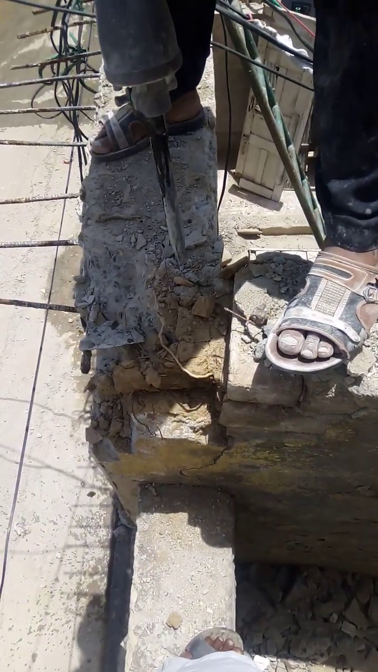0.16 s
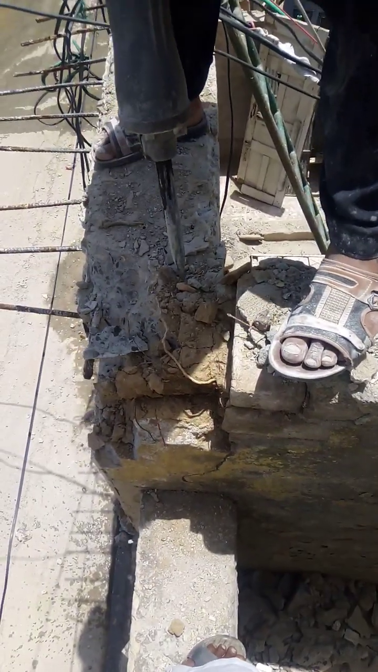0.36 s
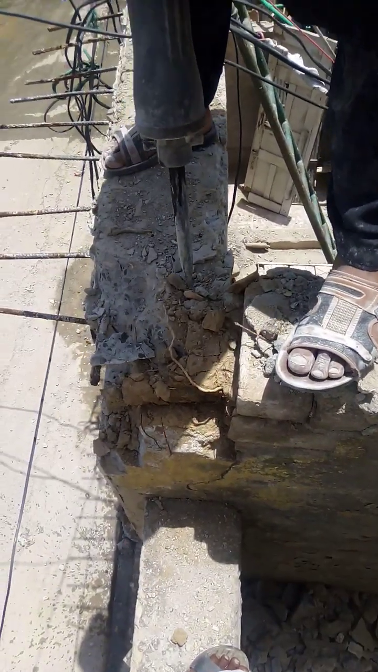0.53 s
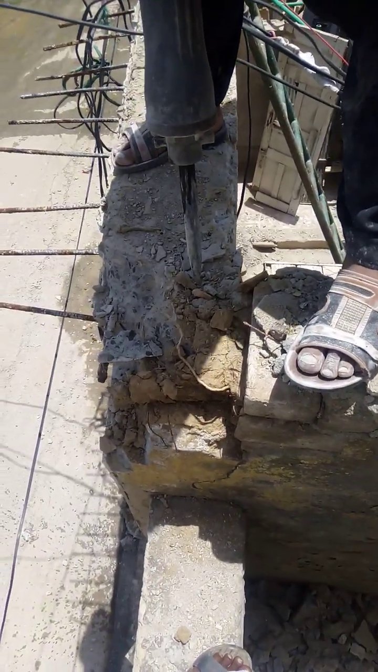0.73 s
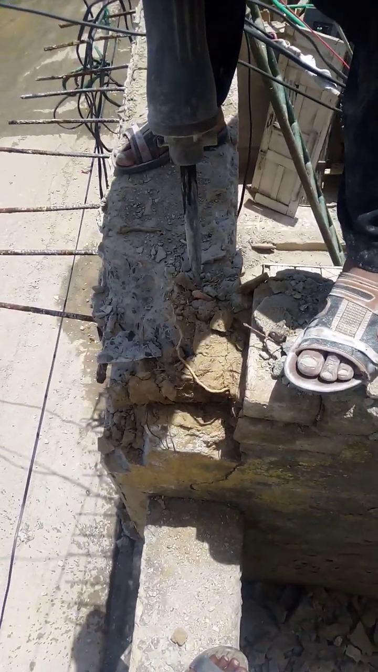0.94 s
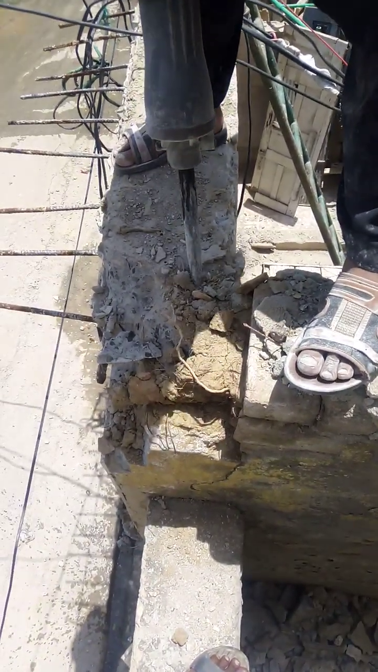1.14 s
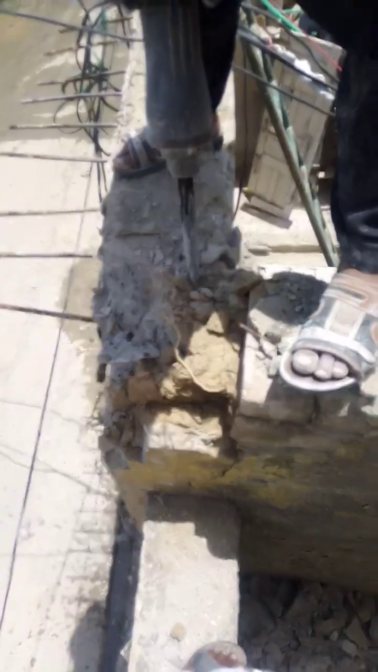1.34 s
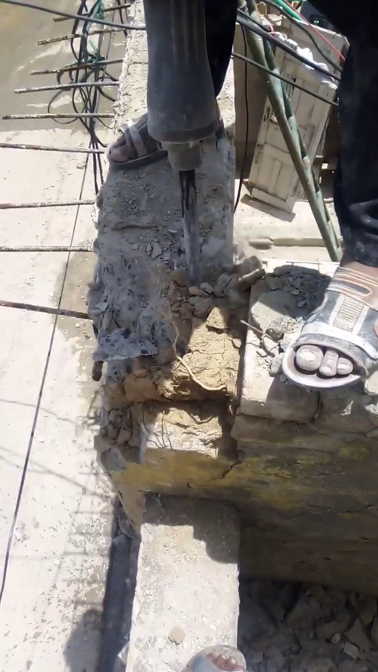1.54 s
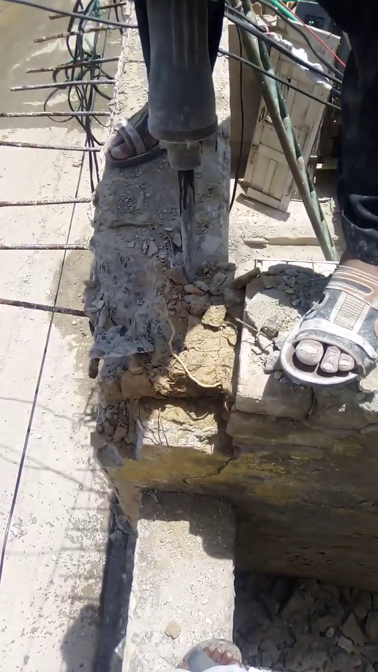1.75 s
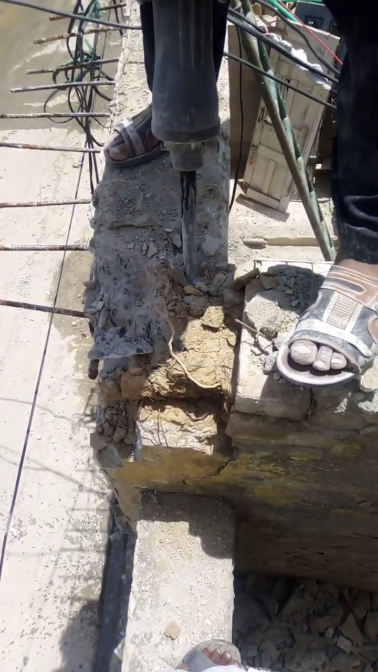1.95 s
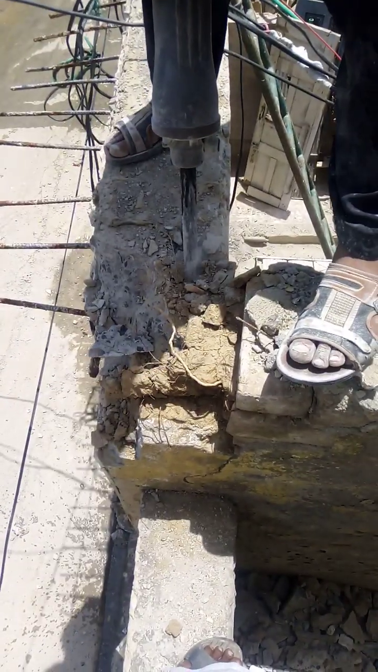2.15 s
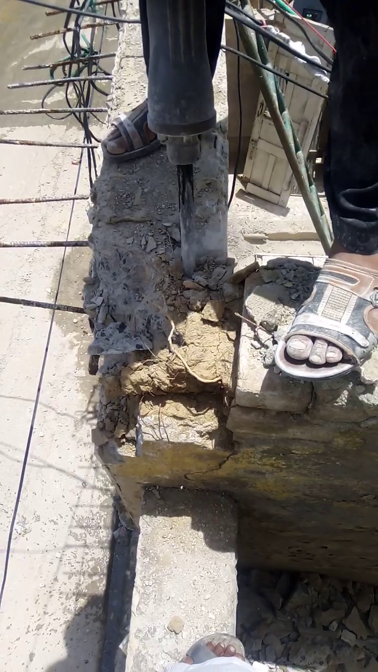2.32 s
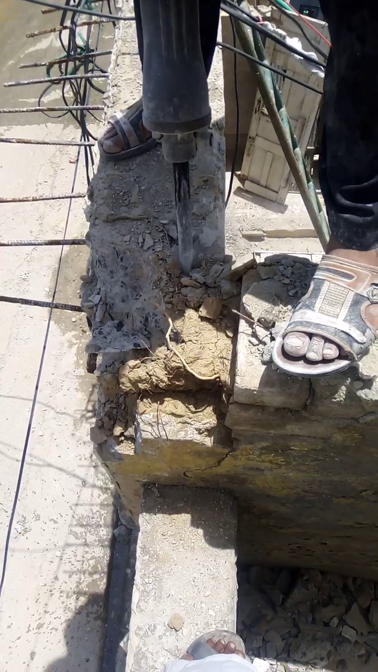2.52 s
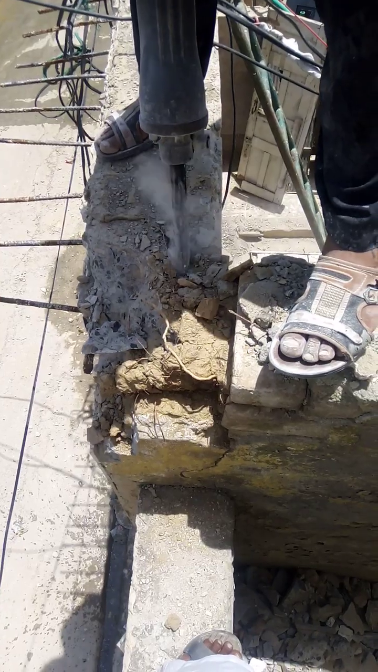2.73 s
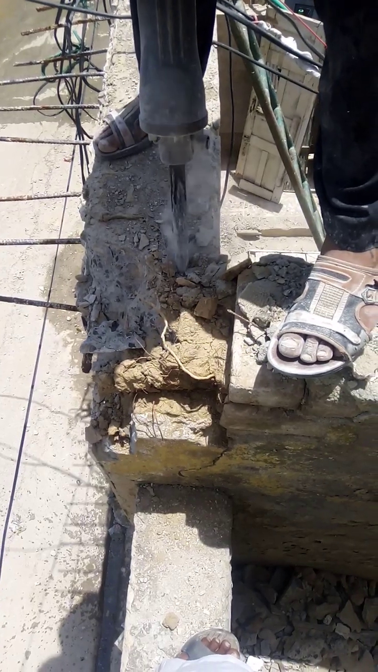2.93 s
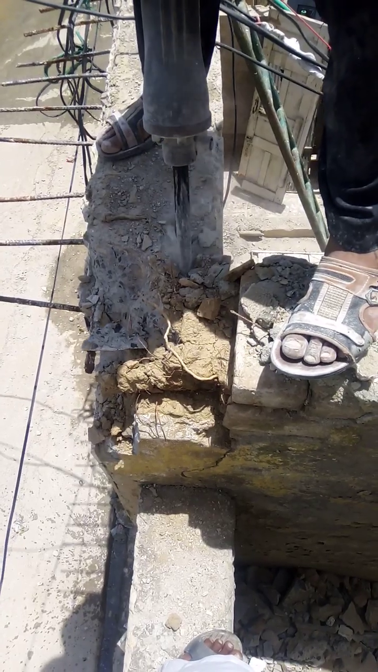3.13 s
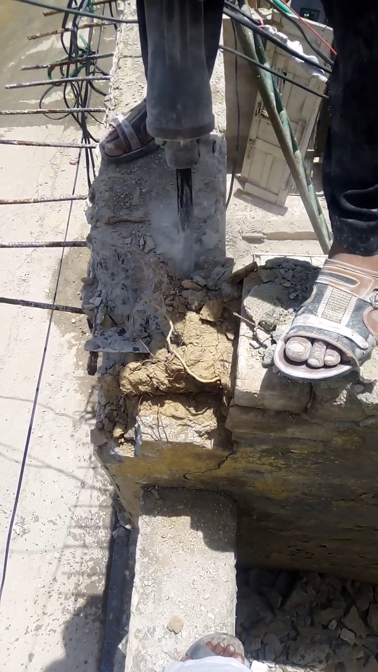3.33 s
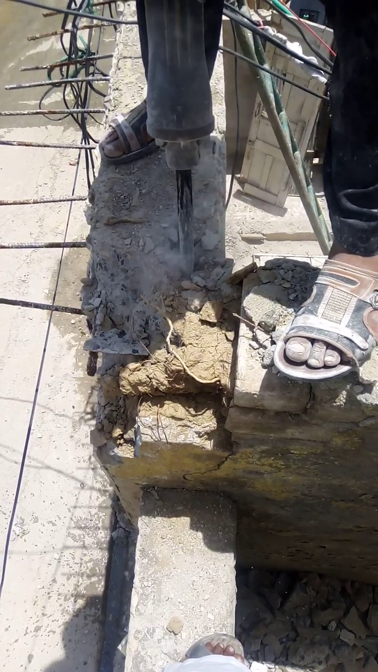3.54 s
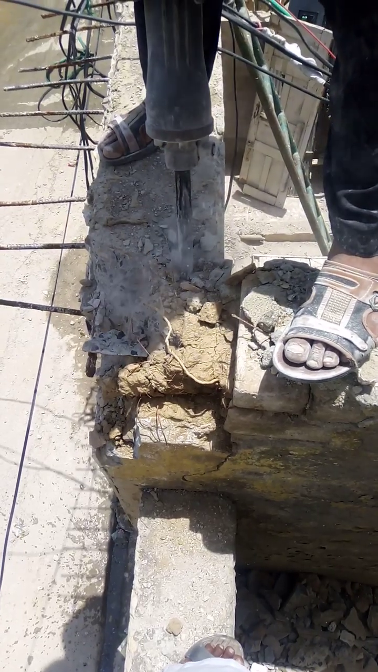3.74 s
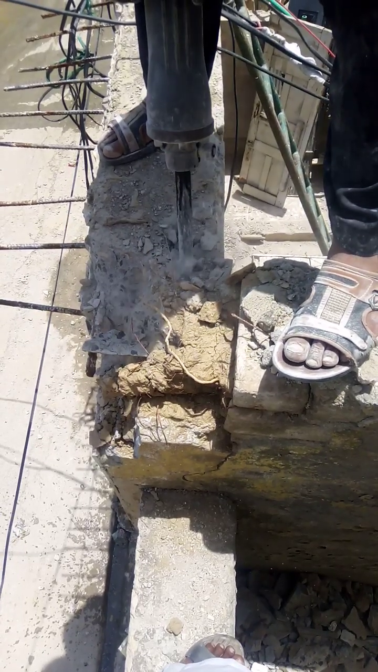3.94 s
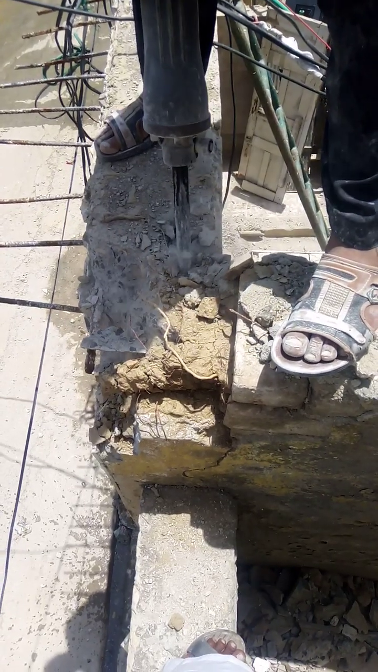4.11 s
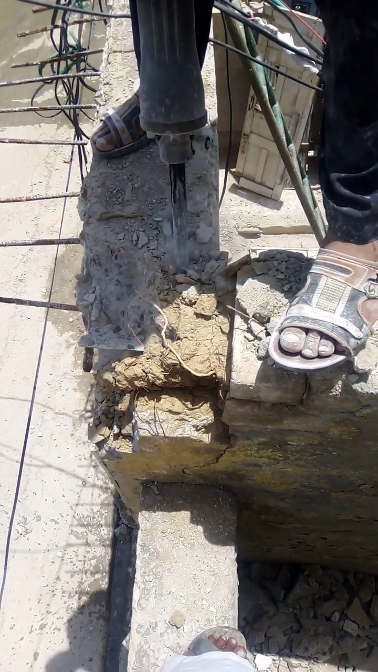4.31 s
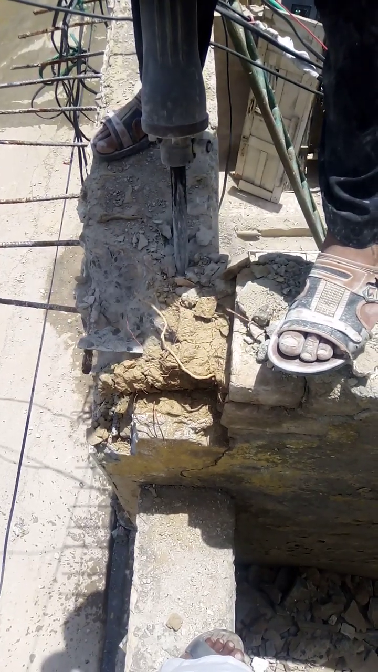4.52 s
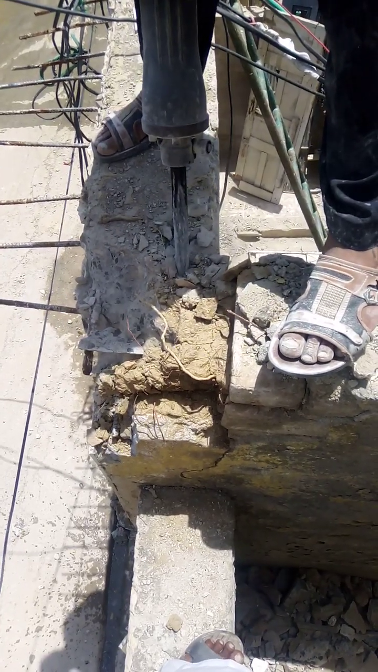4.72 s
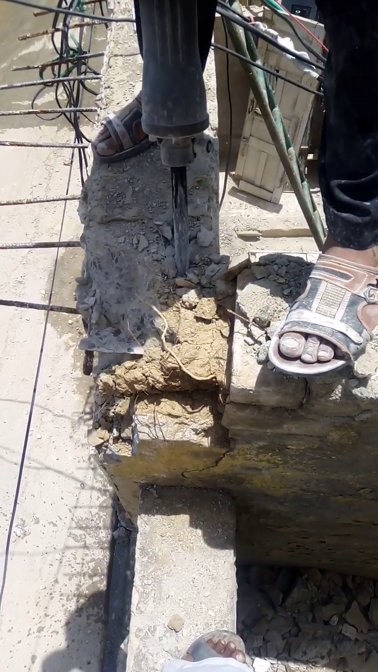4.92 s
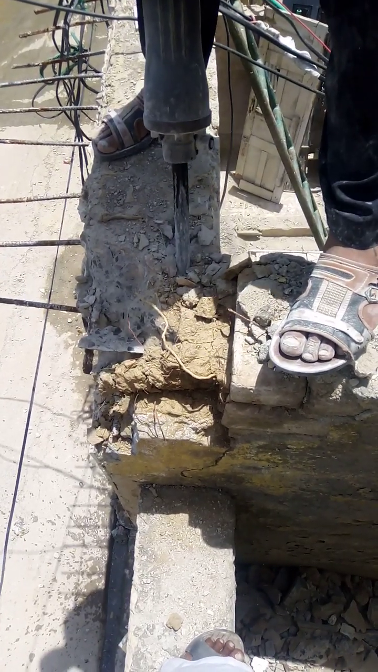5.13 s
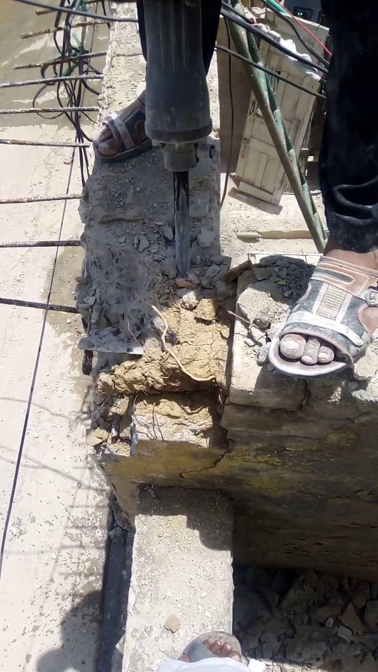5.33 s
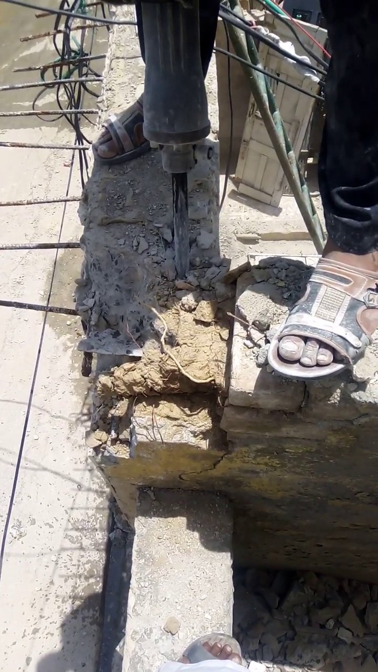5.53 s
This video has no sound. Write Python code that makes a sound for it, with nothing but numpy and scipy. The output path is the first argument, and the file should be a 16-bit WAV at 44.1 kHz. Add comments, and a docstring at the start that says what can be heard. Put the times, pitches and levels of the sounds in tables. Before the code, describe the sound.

The first 0.9 seconds are quiet: a faint low outdoor rumble and thin high hiss, with a steel chisel being placed. Small clinks and gritty scrapes cluster at 0.2-0.4 s, strongest near 0.33 s, followed by soft handling bumps and weak ticks around 0.5-0.7 s. From 0.75 s the chisel slides with a faint rubbing tone and a thin squeak rising to 0.93 s. At 0.9 s the electric motor growls abruptly; blows begin just before 1 s and accelerate to about 25 per second by 1.4 s. Loud, bright steel cracks, midrange knocks and crumbling stone then continue unbroken, with gear and fan rattle, striker clacks and chisel jingle between them. Low wall thuds come in spells from 1.4 to 3.7 s, heaviest around 3.1 s, and again near 4.3 and 5 s. Jingling lessens after 2 s as the tip wedges. The rate sags briefly around 5.3 s; hammering runs to the end, about 5.5 s, close and nearly dry.

```python
"""Over a low outdoor rumble and a faint high hiss, a steel chisel scrapes and clinks as it is set on stone. It
slides in its holder with rubbing noise on a few tones, while a thin whine rises as the motor runs up: a gliding
sine. The electric demolition hammer's motor then growls and runs up: shaped noise, repeated with each crank
turn. Soon the striker hits about 25 times a second. Each blow is a noise crack, a ringing chisel and a wall
thud. Between blows the gears and fan rattle, the striker clacks back and the chisel jingles in its holder."""
import sys
import numpy as np
from scipy import signal
from scipy.io import wavfile
from scipy.ndimage import uniform_filter1d, minimum_filter1d

SR = 44100
rng = np.random.default_rng(int(sys.argv[2]) if len(sys.argv) > 2 else 0)


def wav_out(sig):
    """Save sig, one row per channel (or a flat mono array), as 16-bit PCM at SR to the path in sys.argv[1]."""
    wavfile.write(sys.argv[1], SR, np.round(np.clip(np.atleast_2d(sig).T, -1, 1) * 32767).astype(np.int16))


N = 245637
TIME = np.arange(N) / SR  # seconds since the start of the scene
AGE = np.arange(4096) / SR  # seconds since the start of one short sound

# Tone colour of the outdoor rumble. Each row: frequency in Hz, level in dB per Hz.
RUMBLE_COLOUR = [(20, -25), (70, 5), (160, 1), (280, -15), (450, -8.5), (1100, -16.5), (2000, -29),
                 (9000, -54)]
# Loudness of the rumble. Each row: time in seconds, level in dB.
RUMBLE_LEVEL = [(.1, -64), (.3, -55.5), (.7, -62)]
# Tone colour of the faint high hiss. Each row: frequency in Hz, level in dB per Hz.
HISS_COLOUR = [(1100, -4), (2800, -32), (5200, 2), (6600, 10), (7300, -4), (8400, -31), (16000, -40)]
# Loudness of the hiss. Each row: time in seconds, level in dB.
HISS_LEVEL = [(.15, -83), (.2, -65), (.38, -57.5), (.8, -56.5), (.92, -56)]

# The loose chisel being placed. Each row: start in seconds, level in dB before a common 1 dB cut,
# share of steel ring in the energy (0-1), fading time of the scrape in seconds.
CLINKS = [(.040, -46, .05, .003), (.191, -41, .8, .02), (.234, -27, .96, .012), (.254, -35, .8, .008),
          (.322, -28, .02, .002), (.326, -21, .04, .0022), (.335, -20.5, .06, .0025),
          (.364, -30, .04, .0025), (.643, -42, .1, .005), (.671, -47, .05, .01)]
# Tone colour of the scrapes. Each row: frequency in Hz, level in dB per Hz.
SCRAPE_COLOUR = [(100, -47), (400, -3.5), (1200, -4.5), (1900, -14.5), (2500, -8), (3700, -11),
                 (5200, -2), (6700, -5), (7600, -10.5), (8500, -29), (16000, -43)]
# Ringing tones of the chisel hanging loose.
# Each row: average frequency in Hz, relative level in dB, time to fade by 60 dB in seconds.
LOOSE_CHISEL = [(1058, -20.5, 0.29), (2705, 3.5, 0.037), (2840, -14, 0.13), (4990, -1, 0.069),
                (5030, 7, 0.036), (7800, -35, 0.12), (10300, -33, 0.053)]
# Soft bumps of handling. Each row: start in seconds, level in dB, fading time in seconds.
BUMPS = [(0.08, -45, 0.019), (0.482, -46, .012), (0.616, -43, 0.035), (0.698, -50.5, 0.18)]
# Tone colour of the bumps. Each row: frequency in Hz, level in dB per Hz.
BUMP_COLOUR = [(25, -23), (55, 1), (80, 7), (120, -4.5), (200, -23), (600, -46), (3000, -76)]

# Faint tones of the chisel sliding in its holder. Each row: frequency in Hz, relative level in dB.
SLIDE_TONES = [(1070, -6.5), (2270, -22), (3600, -16)]
# Loudness of the sliding. Each row: time in seconds, level in dB.
SLIDE_LEVEL = [(.66, -93), (.74, -57.5), (.9, -58), (.93, -82)]
# The thin rising whine of the motor running up. Each row: time in seconds, average frequency in Hz, level in
# dB.
SQUEAK = [(.78, 4850, -120), (.81, 5040, -58), (.86, 5800, -53), (.89, 7000, -51), (.93, 7550, -70)]

# Loudness of the motor and gears. Each row: time in seconds, level in dB.
MOTOR_LEVEL = [(.899, -100), (.906, -39.5), (.94, -35), (1.02, -33), (1.08, -36), (1.9, -34.5), (3.8, -33),
               (5.5, -33.5)]
# Growl of the motor as it first takes the load. Each row: time in seconds, level in dB.
GROWL_LEVEL = [(.9, -90), (.907, -36.5), (.945, -36), (.97, -43), (1.03, -66)]
# Speed of the crank: it runs up, settles, and sags once under load.
# Each row: time in seconds, blows per second.
CRANK_SPEED = [(0.96, 3.789), (1.01, 16.368), (1.3, 24.44), (1.51, 25.871), (1.67, 26.732), (1.72, 25.636),
               (2.08, 24.645), (2.13, 25.126), (2.53, 24.925), (3.27, 25.053), (3.41, 24.488),
               (4.34, 24.489), (4.39, 24.634), (4.88, 24.156), (5.24, 22.039), (5.29, 21.656),
               (5.34, 24.199), (5.57, 24.128)]
# Tone colour of the gears and fan together. Each row: frequency in Hz, level in dB per Hz.
GEAR_COLOUR = [(40, -47), (150, -8), (300, 5.5), (500, 4.5), (740, -2), (1350, 0), (2000, -6), (2950, -4),
               (3550, -5), (4450, -3), (5400, 5), (7700, -7.5), (9000, -25), (13800, -32), (15600, -14),
               (16200, -26)]
# Tone colour of the fan before it takes on the gear colour. Each row: frequency in Hz, level in dB per Hz.
FAN_COLOUR = [(500, -2), (2600, 0)]
# The gear housing, shaken by the motor and the returning striker.
# Each row: frequency in Hz, level in dB per Hz.
HOUSING = [(200, -24), (500, 0), (1100, -1), (2200, -15), (6000, -13), (10000, -29), (16000, -40)]
# Hiss of the motor's brushes. Each row: time in seconds, level in dB relative to the gears.
BRUSH_LEVEL = [(.9, -42), (1.3, -29), (2.2, -26), (4, -23.5), (4.6, -18.5)]

# How deep the tip is wedged. Each row: time in seconds, depth (0-1).
DEPTH = [(2, 0.35), (2.2, 0.61), (3.5, 0.69), (3.75, 0.59), (4.05, 0.66), (4.25, .79)]
# Tones of the chisel jiggling in its holder. Each row: frequency in Hz, relative level in dB.
JIGGLE_TONES = [(3650, -1), (5300, -1), (7650, -3)]

# Tone colour of steel cracking on steel. Each row: frequency in Hz, level in dB per Hz.
CRACK_COLOUR = [(1200, -41), (2400, -13.5), (2900, -14.5), (3400, -7), (4400, -12), (5150, -1.5),
                (5900, -7.5), (6700, -5.5), (7300, -11.5), (9000, -24), (13800, -32), (15400, -16),
                (16200, -25)]
# Strength of the crack, rising overall as the tip finds solid stone.
# Each row: time in seconds, average level in dB.
CRACK_LEVEL = [(.96, -20), (1.1, -10.5), (1.22, -16.5), (1.4, -13), (1.55, -16.5), (1.95, -10), (3.0, -10),
               (3.9, -10), (4.6, -11.5), (5.55, -11.5)]
# Quickly fading tones of the tool body and stone, alike at every blow.
# Each row: frequency in Hz, relative level in dB, rise time in seconds.
KNOCK_TONES = [(516, -5, 0.0013), (930, 2.5, 0.0012), (1266, 0, 0.00092), (2064, -8, 0.0015),
               (2530, -2.5, 0.00077), (3315, 3.5, 0.00073), (4080, 10.5, 0.00029)]
# Loudness of that knock. Each row: time in seconds, average level in dB.
KNOCK_LEVEL = [(.96, -29), (1.04, -22), (1.4, -24.5), (1.7, -22), (1.8, -23.5), (2.5, -23), (3.1, -24.5),
               (4.1, -23.5), (4.45, -20.5), (5.05, -23), (5.5, -21)]
# Tone colour of stone crumbling under the tip. Each row: frequency in Hz, level in dB per Hz.
CRUSH_COLOUR = [(120, -13.5), (450, -3), (950, 8), (2800, -10.5), (5000, -42)]
# Tone colour of the wall's thud. Each row: frequency in Hz, level in dB per Hz.
THUD_COLOUR = [(20, -22), (48, -17), (75, 0.5), (140, 0), (220, -1.5), (320, -8.5), (1500, -47.5)]
# Spells in which the tip bites and the blows carry into the wall.
# Each row: start in seconds, end in seconds, average thud level in dB.
BITES = [(1.425, 1.465, -32), (1.58, 1.73, -33.5), (1.77, 1.85, -30.5), (1.89, 1.97, -31.5),
         (2.05, 2.09, -30.5), (2.17, 2.29, -30), (2.37, 2.57, -31.5), (2.61, 2.77, -32), (2.85, 3.05, -30),
         (3.09, 3.17, -23), (3.21, 3.41, -29), (3.45, 3.7, -32), (4.23, 4.31, -27.5), (4.39, 4.43, -26),
         (4.925, 5.14, -29.5), (5.185, 5.275, -31.5)]
# Ringing tones of the chisel under load. Each row: average frequency in Hz, relative level in dB with
# the tip on the surface, the same with the tip wedged deep, time to fade by 60 dB in seconds.
LOADED_CHISEL = [(3450, -14, -13, .04), (5030, 0, -14, .04), (5230, -2, -9, .04), (5520, -8, -4, .035),
                 (6280, -12, 0, .05), (7470, -3, -22, .06), (7800, -7, -22, .055), (10350, -21, -36, .04),
                 (13450, -31, -40, .04), (15620, -20, -25, .06)]
# How freely the chisel rings on after a blow. Each row: time in seconds, average level in dB.
AFTER_RING_LEVEL = [(1.0, -39), (1.4, -27), (1.85, -25), (2.03, -27), (2.11, -36), (2.5, -28), (2.85, -34),
                    (3.35, -30), (3.8, -26.5), (4.5, -37.5), (5.5, -34)]
# Reflections off the ground and the wall. Each row: delay in seconds, gain.
ECHOES = [(.0029, 0.021), (.0075, 0.026)]

FIRST_BLOW_S = .9648  # the crank starts turning here
# size of the rattle's grains: dB per unit of chance
FLUTTER_DB = 4
# outside the bites the thud is light, and grows with the depth of the tip (dB, dB more at full depth)
LIGHT_THUD_DB, THUD_DEPTH_DB = -51.5, 17
# the steel's average ping rises as the tip is wedged (Hz when free, Hz more at full depth)
PING_HZ, PING_DEPTH_HZ = 5520, 700
# chance differences from blow to blow; the free-flying striker also lands early or late
STRAY_S, PING_SPREAD_HZ = .0003, 140
CRACK_SPREAD_DB, KNOCK_SPREAD_DB, THUD_SPREAD_DB, RING_SPREAD_DB = 1, 1.8, 1.8, 3.2
EDGE_HZ = 16300  # upper limit of the finished sound


def amp(db):
    """Turns decibels into gain."""
    return 10 ** (np.asarray(db) / 20)


def unit(x, span=None):
    """Scales to an average (rms) size of 1, over the whole sound or as if it all fell within span seconds."""
    samples = len(x) if span is None else span * SR
    return x / np.sqrt(np.sum(x ** 2) / samples + 1e-20)


def curve(rows, t=TIME, axis=1):
    """Joins the rows of a table by straight lines."""
    rows = np.array(rows)
    return np.interp(t, rows[:, 0], rows[:, axis])


def add(mix, s, sound):
    """Mixes a sound in at s seconds."""
    part = mix[max(round(s * SR), 0):][:len(sound)]
    part += sound[:len(part)]


def body(points):
    """Builds the answer of an object to one tap, with this tone colour and no sound before the tap."""
    hz, db = np.transpose(points)
    bins_hz = abs(np.fft.fftfreq(len(AGE), 1 / SR))
    log_gain = np.log(amp(np.interp(np.log(bins_hz + 1), np.log(hz), db)))
    # minimum phase: the energy comes as early as the colour allows
    return np.fft.ifft(np.exp(np.conj(signal.hilbert(log_gain)))).real


def through(x, response):
    """Passes x through a resonating body."""
    return signal.fftconvolve(x, response)[:len(x)]


def burst(decay, tail=0, tail_decay=1):
    """A spray of tiny impacts: noise that dies quickly, with an optional slower tail."""
    fade = np.exp(-AGE / decay) + tail * np.exp(-AGE / tail_decay)
    return rng.standard_normal(len(AGE)) * fade


def ring(hz, db, t60, spread_hz):
    """Struck steel: dying tones, slightly detuned from one strike to the next."""
    hz = hz + spread_hz * rng.standard_normal(len(hz))
    turns = hz[:, None] * AGE + rng.random((len(hz), 1))
    tones = amp(db[:, None] - 60 * AGE / t60[:, None]) * np.sin(2 * np.pi * turns)
    return tones.sum(0) * (1 - np.exp(-AGE / 0.0006))


def ping(hz, rise):
    """A short swell of ringing as the stress wave runs to and fro."""
    return AGE / rise * np.exp(-AGE / rise) * np.sin(2 * np.pi * hz * AGE)


def sing(hz, rise):
    """Rubbing noise that keeps one resonance sounding."""
    return unit(through(rng.standard_normal(N), ping(hz, rise)))


def background():
    """Low outdoor rumble and a faint high hiss: two steady noises with changing levels."""
    rumble = unit(through(rng.standard_normal(N), body(RUMBLE_COLOUR)))
    hiss = unit(through(rng.standard_normal(N), body(HISS_COLOUR)))
    return amp(curve(RUMBLE_LEVEL)) * rumble + amp(curve(HISS_LEVEL)) * hiss


def placing():
    """The chisel rattles in its holder and scrapes on the stone while the tool is shifted."""
    out = np.zeros(N)
    grit = body(SCRAPE_COLOUR)
    for s, db, share, length in CLINKS:
        scrape = unit(through(burst(length, tail=0.06, tail_decay=0.053), grit), span=length)
        clink = unit(ring(*np.transpose(LOOSE_CHISEL), spread_hz=22.5), span=0.0076)
        # square roots, because the share is one of energy
        contact = np.sqrt(1 - share) * scrape + np.sqrt(share) * clink
        add(out, s, amp(db - 1.0) * contact)
    low = body(BUMP_COLOUR)
    for s, db, length in BUMPS:
        bump = through(burst(length) * np.exp(-(AGE / AGE[-1] * 2) ** 2), low)
        add(out, s, amp(db) * unit(bump, span=length))
    return out


def squeak():
    """The chisel slides in its holder as the tool is leaned on, while a thin whine rises as the motor runs up."""
    tones = sum(amp(db) * sing(hz, rise=.0015) for hz, db in SLIDE_TONES)
    waver = 1 + .012 * unit(uniform_filter1d(rng.standard_normal(N), size=90))
    turns = np.cumsum(curve(SQUEAK) * waver) / SR
    glide = np.sin(2 * np.pi * turns) * (TIME < SQUEAK[-1][0])
    return amp(curve(SLIDE_LEVEL)) * tones + amp(curve(SQUEAK, axis=2)) * glide


def chatter():
    """Loose parts and chips tinkle at random, each at its own pitch."""
    out = np.zeros(N)
    pings = np.array([ping(hz, rise=.0007)[:300] for hz in np.geomspace(1500, 8000, num=40)])
    for when, pitch, chance in rng.random(size=(7000, 3)):
        # most grains are small and a few large, up to a cap
        size = min(-np.log(1 - chance), 2.5)
        add(out, when * N / SR, amp(FLUTTER_DB * size) * pings[int(pitch * len(pings))])
    return unit(out)


def blow_times():
    """The crank drives one blow for every full turn."""
    turns = np.cumsum(curve(CRANK_SPEED) * (TIME >= FIRST_BLOW_S)) / SR
    return TIME[np.searchsorted(turns, np.arange(turns[-1]), side="right")]


def machine():
    """Gears and fan rattle in step with the crank; the striker clacks back about half-way between blows."""
    times = blow_times()
    # one more beat at each end, so that the first and last turns have a length
    beats = np.r_[2 * times[0] - times[1], times, 2 * times[-1] - times[-2]]
    crank = np.interp(TIME, beats, np.arange(len(beats))) % 1
    load_db = -1.2 * np.sin(2 * np.pi * crank)  # louder while the piston compresses the air
    # the same uneven gear teeth come round on every turn of the crank, which gives the buzz
    teeth = signal.resample(rng.standard_normal(size=170), len(AGE))
    buzz = unit(np.interp(crank, np.linspace(0, 1, len(teeth)), teeth))
    fan = unit(through(rng.standard_normal(N), body(FAN_COLOUR)))
    rattle = unit(through(fan + .65 * chatter() + .42 * buzz, body(GEAR_COLOUR)))
    # the brushes sing in a narrow band high above the gears
    brushes = amp(curve(BRUSH_LEVEL)) * sing(12400, rise=.0005)
    out = amp(curve(MOTOR_LEVEL) + load_db) * (rattle + brushes)
    housing = body(HOUSING)
    for s, gap, size in zip(times, np.diff(beats)[1:], rng.standard_normal(len(times))):
        clack = unit(through(burst(decay=.002), housing), span=.003)
        add(out, s + gap / 2 + 0.000966, amp(-33.5 + 2 * size) * clack)
    growl = unit(through(buzz, housing))
    return out + amp(curve(GROWL_LEVEL)) * growl


def jiggle():
    """The chisel keeps jingling in its holder, less so the deeper its tip is wedged."""
    swell = amp(4 * unit(uniform_filter1d(rng.standard_normal(N), size=200)))
    knocks = swell * rng.standard_normal(N)
    chisel = sum(amp(db) * ping(hz, rise=.0005) for hz, db in JIGGLE_TONES)
    jingle = unit(through(knocks, chisel))
    looseness = 1 - curve(DEPTH)
    return amp(curve(MOTOR_LEVEL) + 6.0) * looseness * jingle


def thud_level(s):
    """The wall thuds heavily while the tip bites, lightly otherwise (average level in dB)."""
    for start, end, db in BITES:
        if start <= s < end:
            return db
    return LIGHT_THUD_DB + THUD_DEPTH_DB * curve(DEPTH, s)


def strokes():
    """Each blow as (s, crack dB, ping Hz, knock dB, thud dB, after-ring dB): the tool's state, plus chance."""
    rows = []
    for s in blow_times():
        ping_hz = PING_HZ + PING_DEPTH_HZ * curve(DEPTH, s)
        rows.append((s, curve(CRACK_LEVEL, s), ping_hz, curve(KNOCK_LEVEL, s),
                     thud_level(s), curve(AFTER_RING_LEVEL, s)))
    rows = np.array(rows)
    spread = [STRAY_S, CRACK_SPREAD_DB, PING_SPREAD_HZ, KNOCK_SPREAD_DB, THUD_SPREAD_DB, RING_SPREAD_DB]
    return rows + spread * rng.standard_normal(rows.shape)


def blows():
    """The striker hits the chisel: part of the steel and tool sound repeats, the crushing stone never does."""
    out = np.zeros(N)
    steel, stone, wall = body(CRACK_COLOUR), body(CRUSH_COLOUR), body(THUD_COLOUR)
    mode_hz, shallow_db, deep_db, t60 = np.transpose(LOADED_CHISEL)
    knock = unit(sum(amp(db) * ping(hz, rise) for hz, db, rise in KNOCK_TONES), span=0.015)
    contact = unit(steel)
    for s, crack_db, hz, knock_db, thud_db, ring_db in strokes():
        # the deeper the tip is wedged, the more the high pings take over
        depth = curve(DEPTH, s)
        spray = through(burst(decay=.0027), steel)
        pings = ping(hz, rise=.0006)
        pings += .2 * (1 - depth) * ping(5120, rise=.0011)
        pings += .9 * depth ** 2 * ping(6600, rise=.0008)
        crack = .62 * unit(spray) + .27 * contact + unit(pings)
        add(out, s - .0001, amp(crack_db) * unit(crack, span=0.013))
        crush = unit(through(burst(decay=0.0045), stone), span=0.0062)
        add(out, s - .0003, amp(knock_db) * (0.8 * knock + crush))
        thud = unit(through(burst(decay=0.0024), wall), span=0.018)
        add(out, s + 0.00026, amp(thud_db) * thud)
        after = ring(mode_hz, shallow_db + depth * (deep_db - shallow_db), t60, spread_hz=43)
        add(out, s + .002, amp(ring_db) * unit(after, span=.032))
    return out


def site(x):
    """A few near reflections and a thin tail from the buildings around."""
    t = TIME[:SR // 2]
    tail = rng.standard_normal(len(t)) * np.exp(-t / 0.029) * (t > .008)
    # span of one sample: the level is that of the tail's whole energy against the direct sound
    response = amp(-23.5) * unit(tail, span=1 / SR)
    response = signal.lfilter(*signal.butter(2, 8000, fs=SR), response)
    response[0] = 1  # the direct sound
    for delay, gain in ECHOES:
        add(response, delay, np.array([gain]))
    return through(x, response)


def scene():
    """The tool's sounds reflect off the site; the background is added without reflections."""
    tool = placing() + squeak() + machine() + jiggle() + blows()
    return (background() + site(tool))[None]


def record(dry):
    """A fast limiter turns loud peaks down towards a ceiling; then a filter removes the highest treble."""
    ceiling = .8
    gain = minimum_filter1d(ceiling / np.maximum(abs(dry), ceiling), size=45)
    limited = dry * uniform_filter1d(gain, size=45)
    low_pass = signal.firwin(201, EDGE_HZ, window=("kaiser", 8), fs=SR)
    return signal.oaconvolve(limited, low_pass[None], "same")


dry = scene()
out = record(dry)
wav_out(out)
```